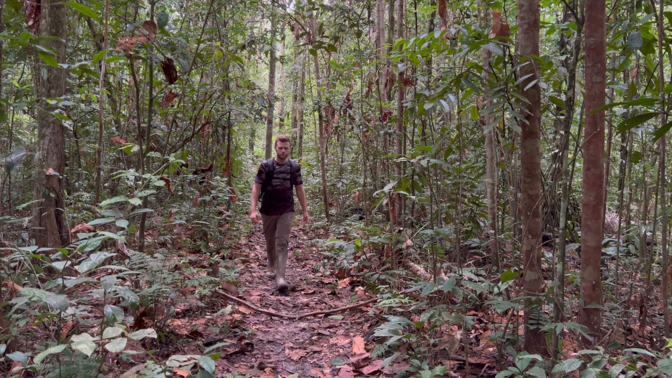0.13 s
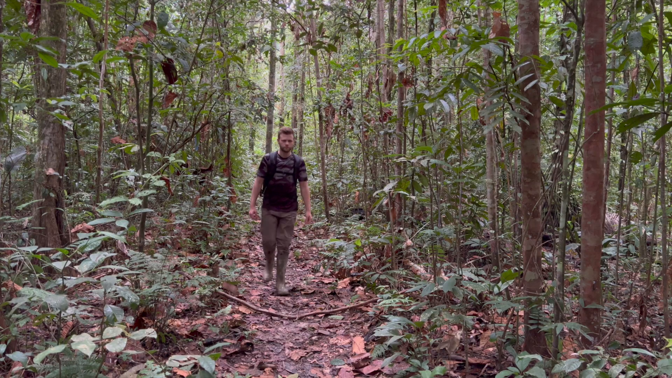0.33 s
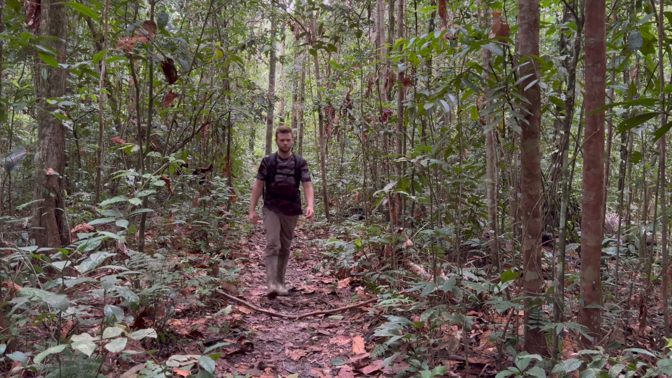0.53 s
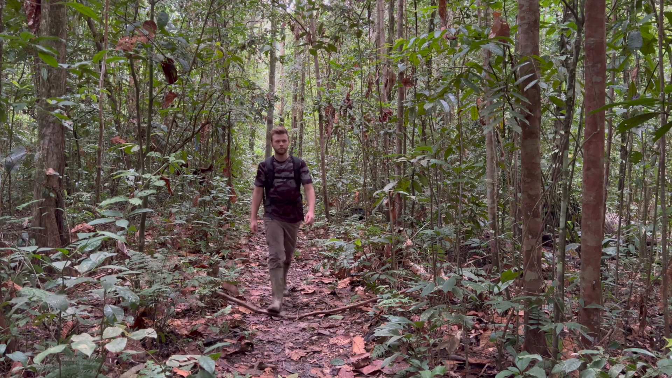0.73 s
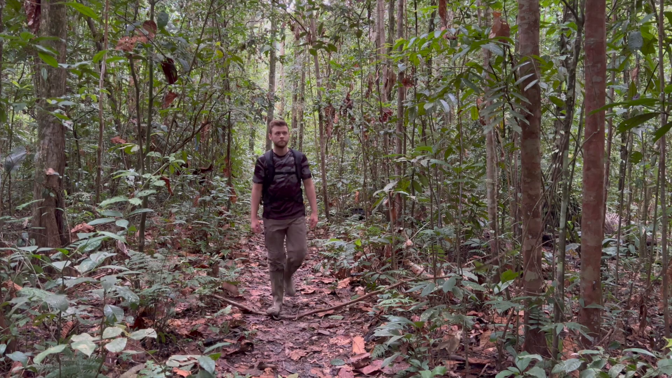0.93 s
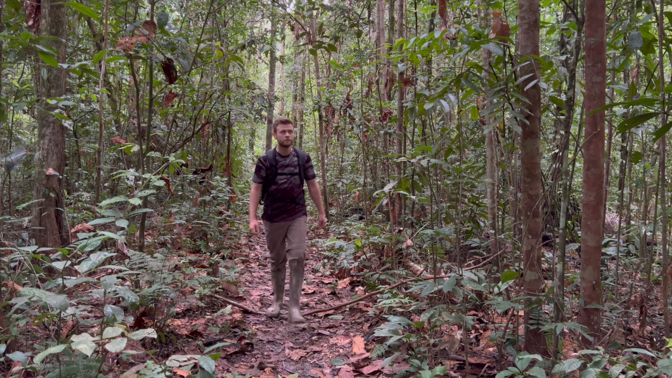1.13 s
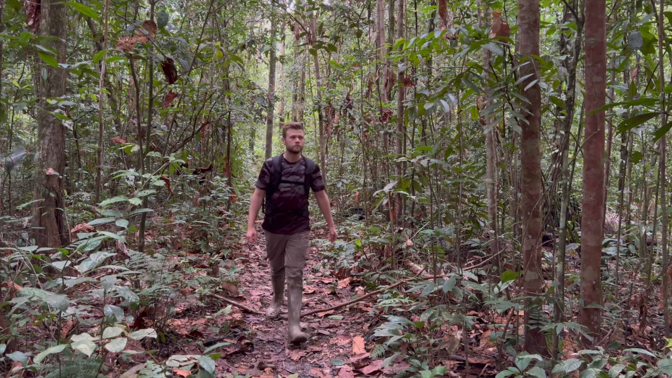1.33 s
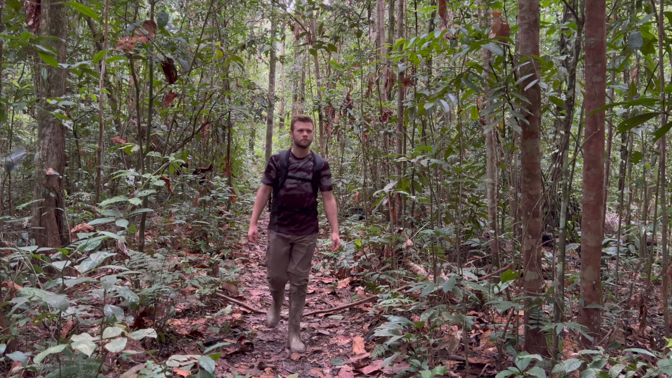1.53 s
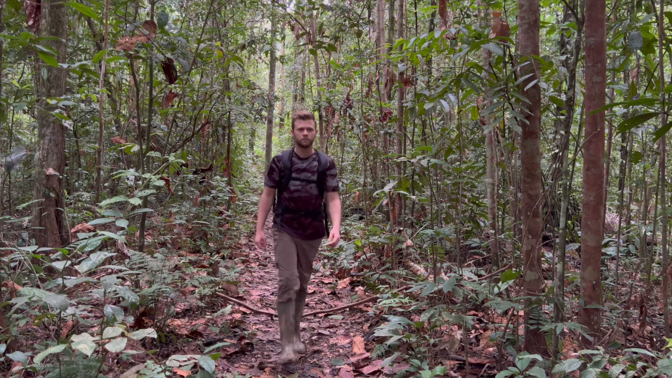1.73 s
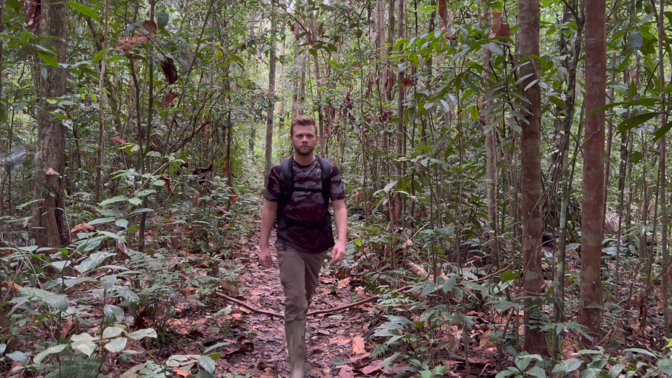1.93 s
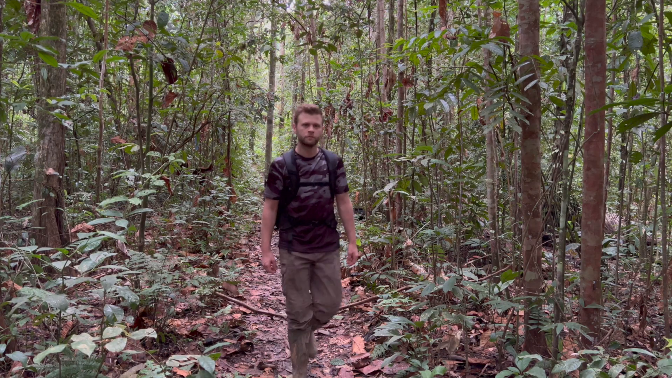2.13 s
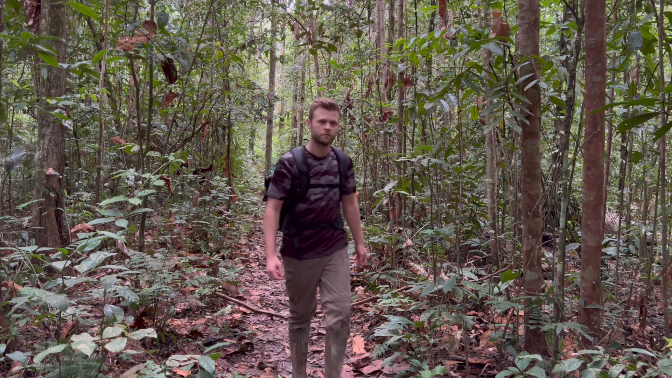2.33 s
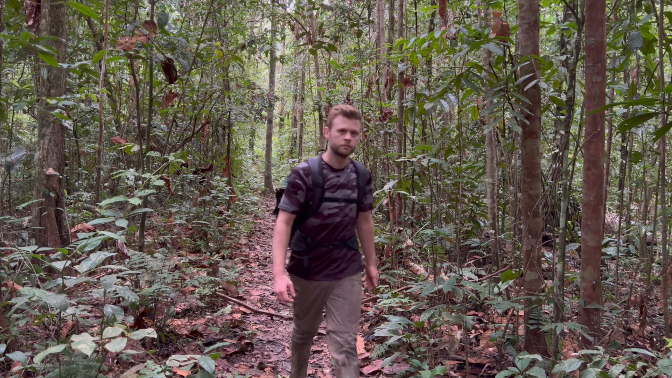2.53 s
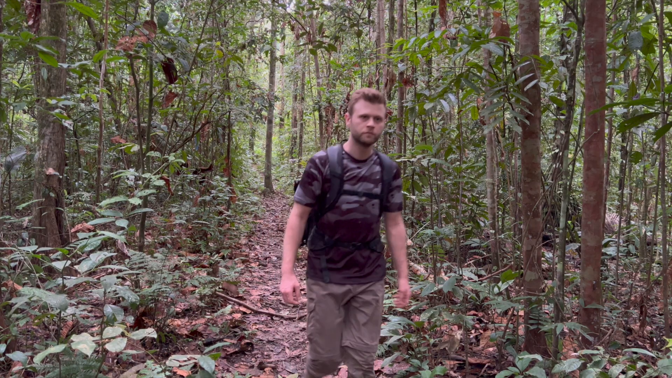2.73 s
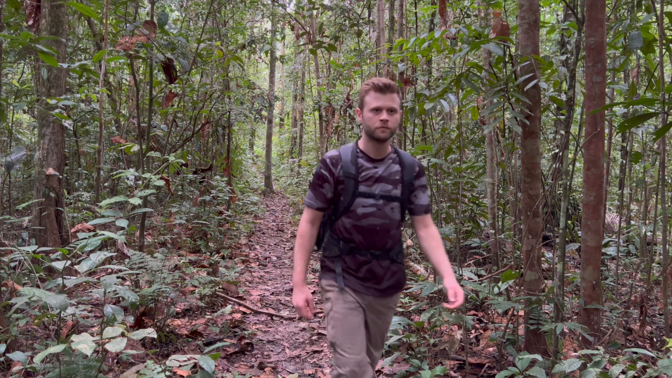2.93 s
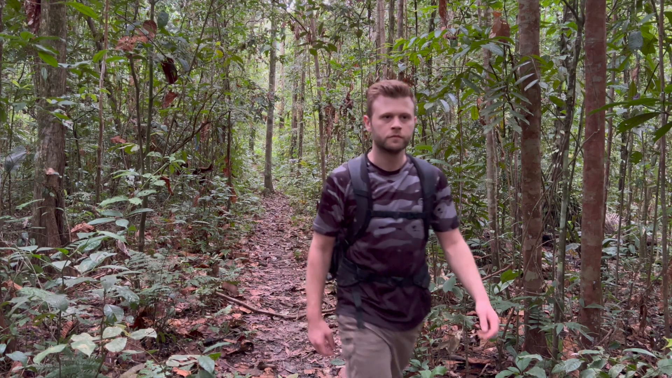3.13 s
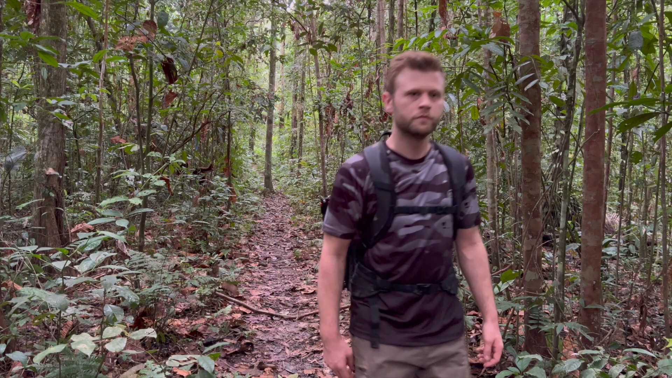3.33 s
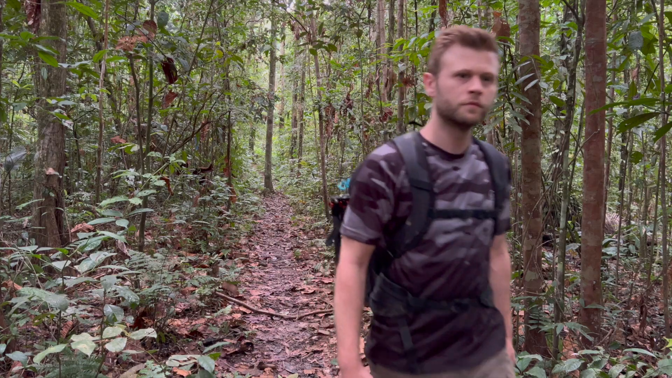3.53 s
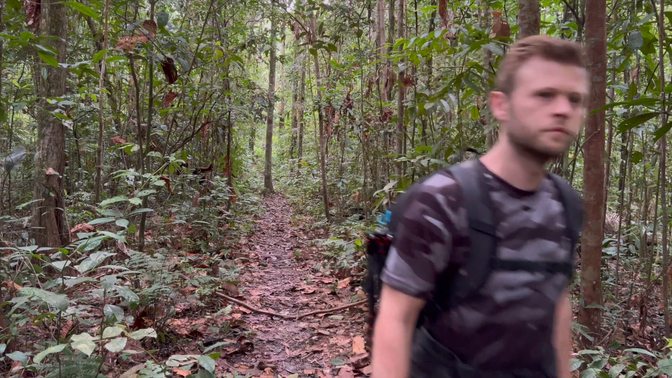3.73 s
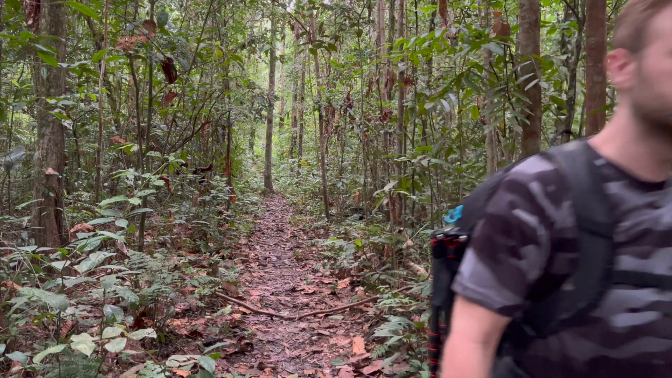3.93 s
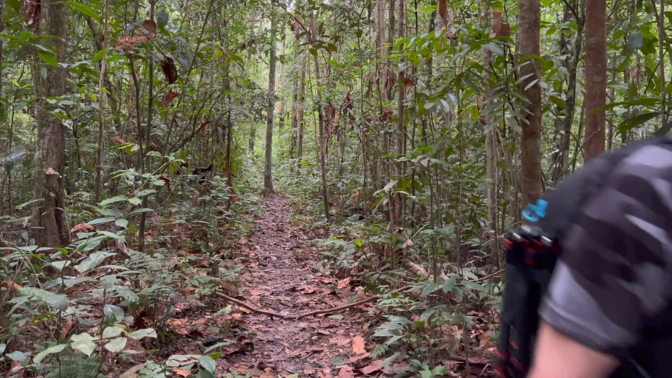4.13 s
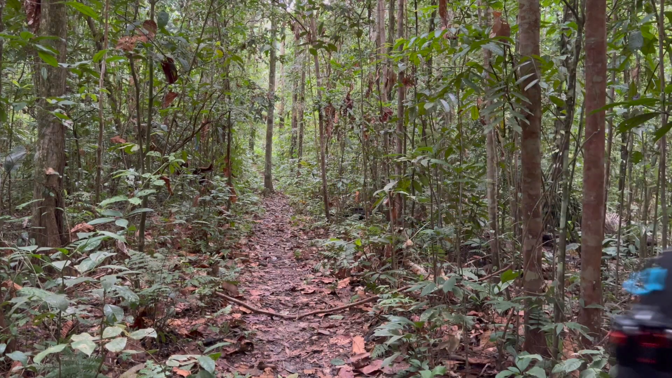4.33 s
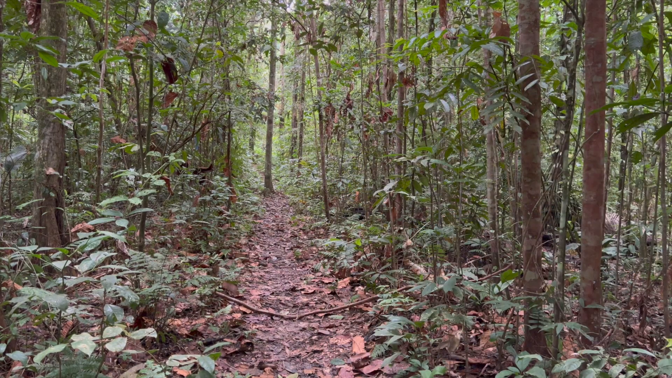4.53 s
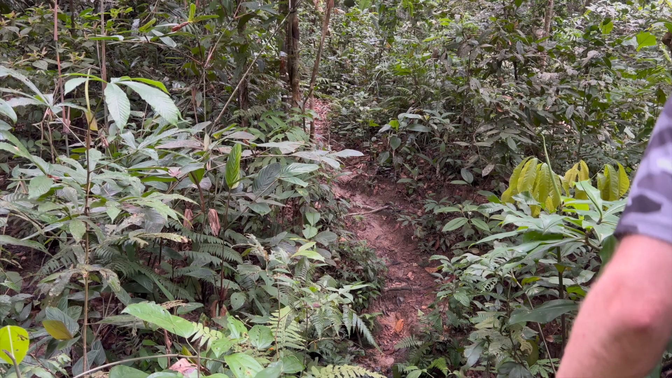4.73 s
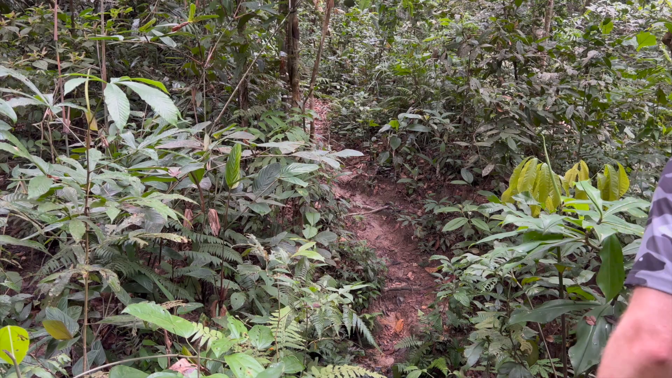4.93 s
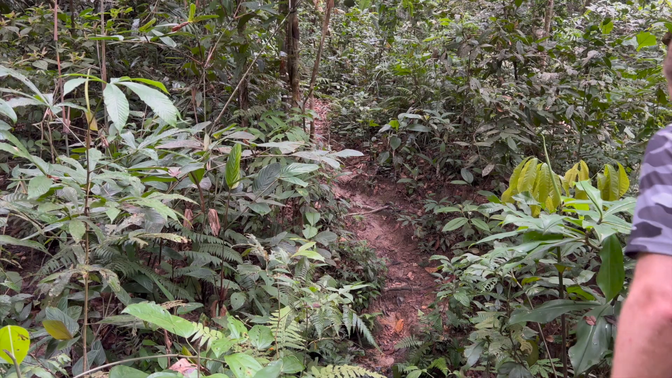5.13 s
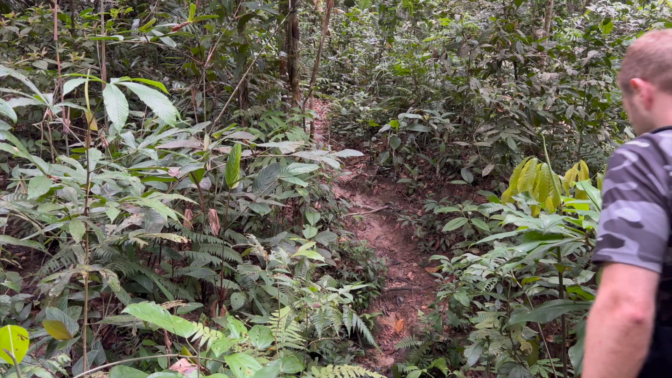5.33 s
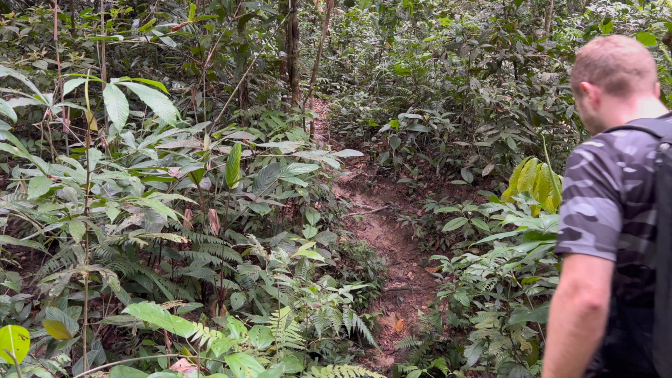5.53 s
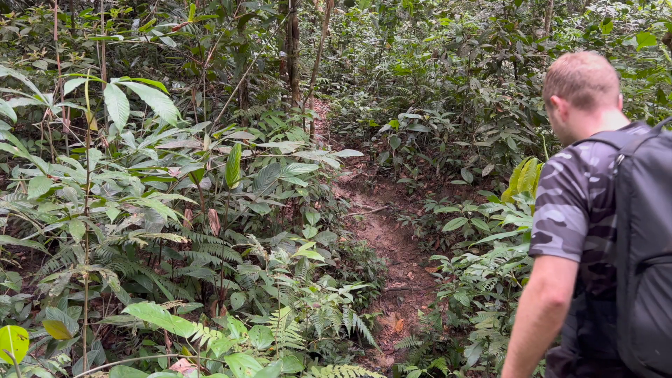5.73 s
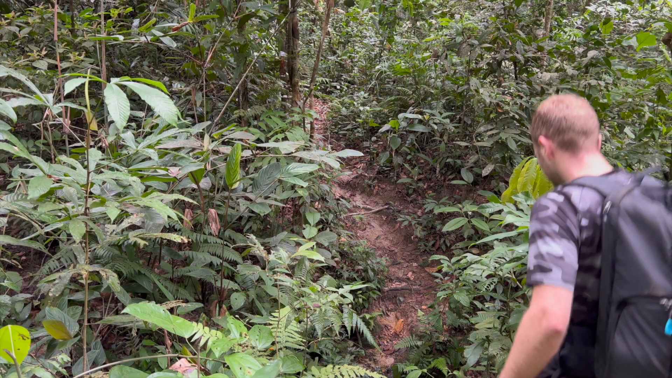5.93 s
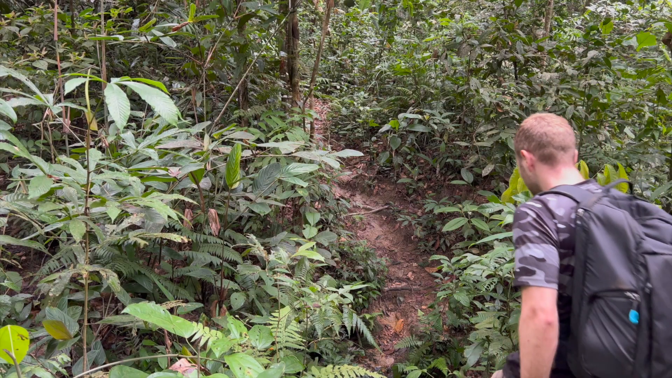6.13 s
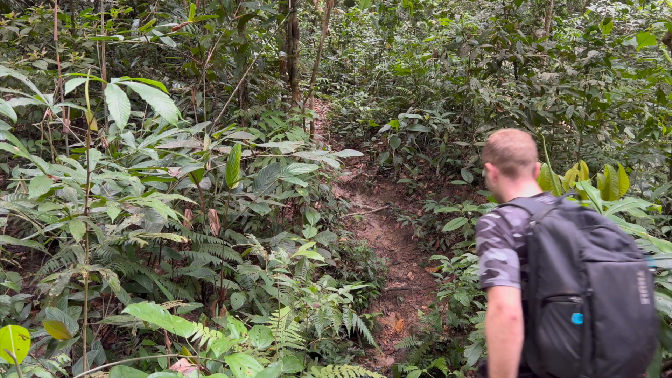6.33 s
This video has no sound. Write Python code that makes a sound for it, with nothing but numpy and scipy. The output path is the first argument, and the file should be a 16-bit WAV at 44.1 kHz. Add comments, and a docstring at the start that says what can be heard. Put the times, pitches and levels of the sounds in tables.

```python
"""From the start, background hush, blurred insect choirs and single crickets (wavering tones, lightly
pulsed) surround a phone. A walker comes down a leafy trail: noise bursts snap twigs, clouds of tiny
cracks crunch leaves, and decaying sines thud on soft earth. At 3.64-3.84 s the walker swings from
ahead to the right. At 4.7 s hush and insects switch to the second scene; leaf or strap rubbing
squeaks as bands of noise, and from 5.17 s a near cricket adds rising chirps."""
import sys
import numpy as np
from scipy import signal
from scipy.fft import rfft, irfft
from scipy.io import wavfile
from scipy.ndimage import uniform_filter1d

SR = 44100
rng = np.random.default_rng(int(sys.argv[2]) if len(sys.argv) > 2 else 0)


def dump(signal):
    """Clip the signal to [-1, 1] and save it as 16-bit WAV at the path in sys.argv[1]."""
    limited = np.clip(np.atleast_2d(signal).T, -1, 1)
    pcm = np.round(limited * 32767).astype(np.int16)
    wavfile.write(sys.argv[1], SR, pcm)


N = 280917
T = np.arange(N) / SR
HZ = np.fft.rfftfreq(N, 1 / SR) + 1  # shifted by 1 Hz so that its logarithm exists

# Background noise of each scene; the first is dark around 9 kHz:
# (frequency [Hz], relative spectrum level [dB])
HUSH_SPECTRA = [
    [(25, -5), (60, 6.5), (200, -6), (1000, -11.5), (3200, -10), (7000, -14.5), (9000, -110), (11000, -10),
     (12500, -10.5), (15500, -15.5)],
    [(25, -27), (60, -9), (200, -8.5), (1000, -7.5), (3200, -11.5), (7000, -20), (9000, -4), (11000, -48),
     (12500, -10), (14500, -21), (15500, -36)],
]
# Hush in the first and the second scene: (level [dB])
HUSH_LEVELS = [-69, -57]
# Distant insect choirs: (centre [Hz], width [Hz], level in first scene [dB], level in second scene [dB])
INSECT_CHOIRS = [(4270, 570, -67.5, -83), (5300, 385, -66, -64.5), (5594, 174, -63, -59),
                 (5930, 150, -72, -70), (6360, 150, -77.5, -81), (7820, 470, -72, -65.5)]
# Single crickets: (tone [Hz], wing strokes [1/s], level in first scene [dB], level in second scene [dB])
SINGLE_CRICKETS = [(5665, 58.5, -65, -71), (5612, 58, -66, -72), (5545, 73, -65, -72), (5435, 44, -69, -70),
                   (5583, 58, -80, -64), (5300, 72, -72, -68)]
# Twigs and stiff leaves breaking: (time [s], ring level [dB], ring [Hz], crack relative to ring [dB])
TWIG_SNAPS = [(0.021, -74, 2380, 27), (0.079, -55, 689, 8), (0.131, -44, 1390, 8.5), (0.205, -69, 1840, 20),
              (0.32, -57, 1240, -21), (0.434, -52, 920, -12), (1.047, -56, 931, -17), (1.169, -55, 620, 5),
              (1.412, -40, 2180, -15), (2.117, -51.5, 1090, -24), (2.355, -45.5, 2300, -32),
              (2.495, -47.5, 2510, 5.5), (2.646, -35, 890, -26), (2.797, -44.5, 805, -20),
              (2.823, -31.5, 596, -26), (2.835, -27.5, 870, -22), (2.841, -30, 1100, -23),
              (2.847, -28, 2350, 0), (2.869, -29.5, 2750, -1), (2.897, -52, 603, -4), (2.93, -47, 3440, -3),
              (3.206, -17, 1110, -2.5), (3.255, -31, 1260, -56), (3.457, -48, 815, -22),
              (3.539, -43.5, 710, 0), (3.587, -44, 730, 3.5), (3.651, -46.5, 1950, -10),
              (3.907, -38, 660, -4), (3.969, -45, 850, -22), (4.112, -51.5, 805, 9.5),
              (4.191, -45, 2470, -9), (4.245, -33, 1550, -22), (4.2855, -28, 800, 9),
              (4.306, -25.5, 1200, 13.5), (4.583, -46.5, 666, -26), (4.75, -32.5, 1320, 10),
              (4.755, -15.5, 1370, -25), (4.761, -17.5, 1320, -4.5), (4.767, -25, 2190, -29),
              (4.832, -43, 666, 10), (4.916, -31.5, 1140, -25), (4.925, -33, 2210, -5),
              (4.934, -38, 2000, -2), (5.014, -25, 820, -8), (5.045, -38.5, 1000, 5),
              (5.125, -37.5, 2740, -7), (5.294, -39.5, 1900, -6), (5.343, -36.5, 1180, -12),
              (5.695, -40.5, 1470, -5), (5.706, -35, 1610, 0), (5.791, -47, 2220, -5),
              (5.84, -35.5, 1020, -10)]
# Leaf beds crushed under a shoe: (start [s], hold [s], leaves [dB], brightness [dB], earth [dB])
LEAF_CRUSHES = [(0.13, 0.039, -65, 33, -54.5), (0.316, 0.16, -77, -9.5, -83), (0.718, 0.093, -62, 2, -63.5),
                (0.79, 0.025, -65.5, -6, -66), (0.827, 0.034, -53, 4.5, -64), (0.95, 0.066, -62.5, -1, -65),
                (1.17, 0.024, -66, 1.5, -83), (1.353, 0.11, -64.5, -2.5, -62),
                (1.494, 0.11, -68.5, -4, -71), (1.939, 0.063, -64.5, 8, -54.5), (2.073, 0.04, -64, -3, -70),
                (2.166, 0.11, -76.5, -12, -90), (2.347, 0.048, -66, 3.5, -75.5),
                (2.49, 0.11, -58.5, 0.5, -63.5), (2.633, 0.015, -56, -3, -54),
                (2.835, 0.024, -42, 2.5, -52), (2.737, 0.046, -63, -11, -60), (3.126, .06, -63, 2, -58),
                (3.215, 0.047, -54, 6, -55.5), (3.339, 0.06, -59.5, 0, -66), (3.453, 0.011, -56, 2, -65),
                (3.568, 0.0081, -56.5, -1.5, -82), (3.743, 0.089, -57, 7.5, -58),
                (3.894, 0.14, -62.5, -8, -58), (4.186, 0.034, -59.5, 15, -73), (4.25, 0.06, -39, 6.5, -45),
                (4.434, 0.12, -65.5, -9.5, -58.5), (4.707, 0.04, -57, -2.5, -70),
                (4.743, 0.013, -42, 12, -48.5), (4.817, 0.053, -52.5, 7, -51.5),
                (4.899, 0.066, -46, 3.5, -61), (5.009, .04, -48.5, 9, -57.5),
                (5.292, 0.043, -55.5, -3, -60), (5.469, .09, -58.5, 11, -61.5),
                (5.631, 0.018, -68, -13.5, -69), (5.727, 0.056, -62, 5, -86), (5.834, 0.11, -58, 2, -61),
                (5.966, 0.054, -53, 3.5, -60.5), (6.173, 0.022, -58, 11, -62), (6.309, .05, -60.5, 17, -61)]
# Colour of dry rustle: (frequency [Hz], relative spectrum level [dB])
RUSTLE_SPECTRUM = [(3000, 1), (4500, 5.5), (6000, 2.5), (8000, 4), (10000, -4.5), (12000, 2.5),
                   (15500, -4.5)]
# Soles meeting the earth: (time [s], knock level [dB], earth ring relative to knock [dB])
SOLE_THUDS = [(0.128, -42, -12), (0.238, -49.5, 1), (0.732, -40, 1), (0.772, -42.5, -11),
              (0.967, -50.5, -1), (1.341, -57, 13), (1.418, -51, 5), (1.961, -38.5, -3), (1.985, -35, -25),
              (2.074, -39.5, -32), (2.54, -39, -18), (2.615, -46, -7), (2.838, -36, -16), (2.864, -39, -19),
              (2.884, -36.5, -16), (3.174, -49.5, 6), (3.203, -35, -17), (3.249, -53, 11),
              (3.757, -48, 8.5), (3.91, -43, 9), (3.941, -47, -6), (4.26, -38, -21), (4.282, -46, -4),
              (4.303, -38.5, 1.5), (4.356, -45, 5), (4.466, -37, 6), (4.481, -42, -8.5),
              (4.754, -33.5, -30), (4.816, -37, -18), (4.829, -38.5, 4), (5.012, -40, -2), (5.215, -44, -8),
              (5.292, -43, -13), (5.34, -39, -33), (5.521, -44, -18), (5.847, -36, -34), (5.942, -49, 9),
              (5.969, -51, -2), (6.244, -50, 6)]
# Modes of a thud, in order knock, slap and two earth rings: (frequency [Hz], t60 [s], level [dB])
THUD_MODES = [(328, 0.016, 3), (574, 0.018, -12), (94, 0.055, -2.5), (160, 0.084, -9.5)]
# Rubbing of a leaf or strap: (start [s], length [s], centre [Hz], level [dB])
RUB_SQUEAKS = [(4.663, .03, 1590, -68), (5.377, 0.031, 1483, -59.5)]
# Chirps of a near cricket: (start [s], length [s], level [dB])
NEAR_CHIRPS = [(5.171, .17, -57), (5.397, 0.18, -57.5), (5.627, 0.17, -57), (5.852, 0.162, -56.5),
               (6.192, 0.35, -57)]
# Likeness of the two ports in diffuse sound: (frequency [Hz], common share of power [0-1])
PORT_LIKENESS = [(100, 0.82), (1000, 0.21), (3000, 0.1), (6000, 0.05), (7500, 1), (9000, 0.64),
                 (10800, .999), (11500, .7), (13000, 0.6), (15500, 0.9)]
# Left over right port for sound from ahead: (frequency [Hz], level difference [dB])
AHEAD_BALANCE = [(60, 1), (400, -2), (1400, 0.5), (3400, 1.5), (4400, 4.5), (5400, 8.5), (6500, 6),
                 (7600, 0.5), (9000, 0), (16000, 2.5)]
# Left over right port for sound from beside: (frequency [Hz], level difference [dB])
BESIDE_BALANCE = [(60, 1.5), (400, -3.5), (1400, -8), (2400, 0), (3400, 3.5), (4400, 2), (5400, 11.5),
                  (6500, 0), (7600, 3.5), (16000, -2)]
# Treble end that both phase tables below share: (frequency [Hz], phase difference [rad])
TREBLE_RAD = [(8500, -1.8), (9300, -3), (10700, -3.3), (11600, -4.6), (12500, -6.1), (14200, -6.5),
              (15000, -7.4), (15800, -8.7)]
# Left against right port for sound from ahead: (frequency [Hz], phase difference [rad])
AHEAD_PHASE = [(60, -0.014), (1400, 0.82), (2400, 0.57), (3400, 0.97), (5500, 1.0), (6500, 0.31),
               (7600, -1.16)] + TREBLE_RAD
# Left against right port for sound from beside: (frequency [Hz], phase difference [rad])
BESIDE_PHASE = [(60, 0.15), (340, -0.93), (1400, -0.81), (2400, -1.16), (3400, -1.9), (5500, -1.67),
                (6500, -1.67), (7600, -1.3)] + TREBLE_RAD

SECOND_SCENE_S = 4.7  # hush and insects switch to the second scene
PASS_START_S, PASS_END_S = 3.64, 3.84  # the walker swings from ahead to the right
SNAP_T60_S = 0.013
RISE_DB_S, FALL_DB_S = 1100, 196  # a crush swells and dies
SETTLE_DB, SETTLE_DB_S = -11.5, 47  # leaves keep settling: relative level and fall per second
DAMP_DB, DRY_DB, DRY_PER_BRIGHT = -3.5, -4.5, 0.2  # brightness takes from damp litter, adds to dry
POPS_PER_S, POP_LOW_HZ, POP_HIGH_HZ = 90, 436, 3020
POP_Q, POP_DB = 6.1, -8.5  # level relative to the leaves
CHIRP_HZ, CHIRP_RISE_HZ = 7820, 246
TRUNKS_T60_S, TRUNKS_DB = 0.079, -11.5
LATE_TURNS = 1.8  # cycles by which frequencies above 30 Hz lag
TOP_HZ = 15700


def undb(db):
    """Level law: decibels to amplitude gain."""
    return 10 ** (np.asarray(db) / 20)


def unit(x):
    """Energy normalisation: scale to rms 1."""
    return x / np.sqrt(np.mean(x ** 2))


def over_hz(table):
    """Logarithmic frequency scale: read a (Hz, value) table at every frequency."""
    hz, value = np.transpose(table)
    return np.interp(np.log(HZ), np.log(hz + 1), value)


def band(x, lo_hz, hi_hz, order=2):
    """Frequency selection: a causal band-pass."""
    return signal.sosfilt(signal.butter(order, [lo_hz, hi_hz], "band", fs=SR, output="sos"), x)


def walk(rate):
    """Slow random modulation: levels held 1 / rate s, smoothed twice, with rms 1."""
    hold = int(SR / rate)
    steps = np.repeat(rng.standard_normal(N // hold + 1), hold)
    return unit(uniform_filter1d(uniform_filter1d(steps, hold), hold)[:N])


def add(out, s, x):
    """Superposition: mix a short sound in at time s."""
    i = max(int(s * SR), 0)
    out[i:i + len(x)] += x[:N - i]


def by_scene(first_db, second_db):
    """Level change between the two scenes: the gain glides over 40 ms."""
    return undb(np.interp(T, [SECOND_SCENE_S - .02, SECOND_SCENE_S + .02], [first_db, second_db]))


def ports(x, balance_db, phase_rad):
    """Directional hearing: level and phase differences between the left and right port."""
    half = undb(over_hz(balance_db) / 2) * np.exp(.5j * over_hz(phase_rad))
    return irfft(rfft(x) * np.array([half, 1 / half]), N)


def diffuse(make):
    """Partial coherence: a share common to both ports plus an independent share for each."""
    alike = np.clip(over_hz(PORT_LIKENESS), 0, 1)
    common = ports(make(), AHEAD_BALANCE, AHEAD_PHASE)
    own = np.array([ports(make(), AHEAD_BALANCE, AHEAD_PHASE)[k] for k in range(2)])
    return irfft(np.sqrt(alike) * rfft(common) + np.sqrt(1 - alike) * rfft(own), N)


def hush():
    """Broadband noise: random noise with a shaped spectrum breathes slowly."""
    def noise(spectrum, db):
        """Spectral shaping of white noise to a set level."""
        white = rfft(rng.standard_normal(N))
        return undb(db) * unit(irfft(white * undb(over_hz(spectrum)), N))

    first, second = (noise(c, db) for c, db in zip(HUSH_SPECTRA, HUSH_LEVELS))
    return (first * by_scene(0, -60) + second * by_scene(-49, 0)) * undb(walk(1.6))


def choirs():
    """Incoherent summation: many far insects blur into narrow noise bands that flicker."""
    out = np.zeros(N)
    for hz, width, first_db, second_db in INSECT_CHOIRS:
        blur = unit(band(rng.standard_normal(N), hz - width / 2, hz + width / 2, order=3))
        out += by_scene(first_db, second_db) * undb(1.7 * walk(12)) * blur
    return out


def crickets():
    """Amplitude modulation: wing strokes lightly pulse each wavering tone."""
    out = np.zeros(N)
    for hz, rate, first_db, second_db in SINGLE_CRICKETS:
        tone = np.sin(2 * np.pi * np.cumsum(hz + 11 * walk(12)) / SR)
        stroke_hz = rate * (1 + 0.0182 * walk(1.3))
        strokes = 1 + 0.23 * np.sin(2 * np.pi * np.cumsum(stroke_hz) / SR)
        out += by_scene(first_db, second_db) * undb(2.24 * walk(16)) * strokes * tone
    return ports(out, AHEAD_BALANCE, AHEAD_PHASE)


def crest(x):
    """Envelope peak: the power is first smoothed over a millisecond."""
    return np.sqrt(2 * uniform_filter1d(x ** 2, size=SR // 1000).max())


def snaps():
    """Brittle fracture: a burst of tearing fibres excites a dull wood ring and a bright crack."""
    out, t = np.zeros(N), T[:SR // 12]
    for s, db, hz, crack_db in TWIG_SNAPS:
        decay = 1000 ** (-t / SNAP_T60_S) + 0.17 * 1000 ** (-t / (2.0 * SNAP_T60_S))
        burst = rng.standard_normal(len(t)) * decay
        burst[0] += 4.0  # the first break
        ring = band(burst, hz / 1.44, hz * 2.0) + 0.26 * band(burst, 330, 3200)
        crack = band(burst, 2200, 14000, order=1) + 1.3 * band(burst, 5590, 5750, order=1)
        crack = crack / crest(band(crack, 6000, 13400))
        add(out, s, undb(db) * (ring / crest(ring) + undb(crack_db) * crack))
    return out


def grains(per_s, scatter_db, smear_s):
    """Shot noise: random cracks of very uneven size, each a short puff of noise."""
    size = undb(scatter_db * np.minimum(rng.exponential(1, N), 4))
    cracks = (rng.random(N) < per_s / SR) * size
    envelope = signal.lfilter([1], [1, -np.exp(-1 / (smear_s * SR))], cracks)
    return envelope * rng.standard_normal(N)


def crumple(lo_hz, hi_hz, per_s, smear_s, count):
    """Size and pitch: pieces of different size crack independently, each in its own band."""
    edges = np.geomspace(lo_hz, hi_hz, count + 1)
    pieces = (band(unit(grains(per_s, 2.76, smear_s)), a, b, order=1) for a, b in zip(edges, edges[1:]))
    return unit(sum(pieces))


def press(levels_db):
    """Power summation of crushes: each swells, holds, dies and leaves a slow settling."""
    power = np.zeros(N)
    for (s, hold, *_), db in zip(LEAF_CRUSHES, levels_db):
        before, after = np.maximum(s - T, 0), np.maximum(T - s - hold, 0)
        fall = undb(-FALL_DB_S * after) ** 2
        settling = undb(SETTLE_DB - SETTLE_DB_S * after) ** 2
        power += undb(db - RISE_DB_S * before) ** 2 * (fall + settling)
    return np.sqrt(power)


def pops():
    """Buckling: stiff leaves give damped pitched ticks of uneven size at random moments."""
    out, t = np.zeros(N), T[:SR // 25]
    for when, pitch, size in rng.random((int(POPS_PER_S * N / SR), 3)):
        hz = POP_LOW_HZ * (POP_HIGH_HZ / POP_LOW_HZ) ** pitch
        tick = np.sin(2 * np.pi * hz * t) * np.exp(-np.pi * hz * t / POP_Q)
        add(out, when * N / SR, (size + .05) ** -.6 * tick)
    return unit(out)


def litter():
    """Granular crushing: earth, damp litter and dry leaves give way under the shoes."""
    _, _, leaves_db, bright_db, earth_db = np.transpose(LEAF_CRUSHES)
    earth_gain, leaf_gain = press(earth_db), press(leaves_db)
    damp_gain = press(leaves_db + DAMP_DB - bright_db)
    dry_gain = press(leaves_db + DRY_DB + DRY_PER_BRIGHT * bright_db)
    fine = unit(grains(4600, 2.6, 0.0051))
    coarse = unit(grains(380, 2.1, 0.0024))
    rustle = irfft(rfft(band(fine + 1.17 * coarse, 4050, 16600)) * undb(over_hz(RUSTLE_SPECTRUM)), N)
    rustle = rustle / np.std(band(rustle, 10400, 19300))  # level set by its upper treble
    leaves = crumple(827, 4390, 250, 0.0026, count=5)
    leaves += 2.04 * unit(band(0.79 * fine + coarse, 1330, 5700))
    leaves = unit(leaves) + undb(POP_DB) * pops()
    earth = unit(band(grains(120, 3.06, 0.0035), 41, 234))
    damp = crumple(253, 1056, 150, 0.0027, count=4)
    return earth_gain * earth + damp_gain * damp + leaf_gain * leaves + dry_gain * rustle


def thuds():
    """Modal impact: each footfall knocks, slaps and rings the soft earth as decaying sines."""
    out, t = np.zeros(N), T[:SR // 8]
    for s, db, earth_db in SOLE_THUDS:
        blows_db = (db, db, db + earth_db, db + earth_db / 2)
        for (hz, t60, mode_db), blow_db in zip(THUD_MODES, blows_db):
            mode_hz = hz * (1 + 0.062 * rng.standard_normal())
            add(out, s, undb(mode_db + blow_db) * np.sin(2 * np.pi * mode_hz * t) * 1000 ** (-t / t60))
    return out


def squeaks():
    """Friction: rubbing gives a rough short tone, made as a narrow band of noise."""
    out = np.zeros(N)
    for s, length, hz, db in RUB_SQUEAKS:
        t = T[:int(length * SR)]
        rough = unit(band(rng.standard_normal(SR // 4), hz - 60, hz + 60))[-len(t):]
        add(out, s, undb(db) * np.sin(np.pi * t / length) * rough)
    return out


def near_cricket():
    """Frequency and amplitude modulation: chirps rise in pitch, pulsed by wing strokes."""
    near = np.zeros(N)
    for s, length, db in NEAR_CHIRPS:
        u = T[:int(length * SR)] / length  # share of the chirp elapsed
        hz = CHIRP_HZ - CHIRP_RISE_HZ * np.exp(-u / 0.17)
        strokes = 1 + 0.81 * np.sin(2 * np.pi * 82 * u * length)  # 82 strokes per s
        tone = np.sin(2 * np.pi * np.cumsum(hz) / SR)
        add(near, s, undb(db) * np.sin(np.pi * u) ** .5 * strokes * tone)
    rasp = 1 + 0.19 * unit(band(rng.standard_normal(N), 35, 200))
    return ports(near * rasp, BESIDE_BALANCE, BESIDE_PHASE)


def walker():
    """Direct and scattered sound: footfalls turn from ahead to the right and echo off the trunks."""
    feet = snaps() + litter() + thuds() + squeaks()
    turn = np.interp(T, [PASS_START_S, PASS_END_S], [0, np.pi / 2])
    ahead = np.cos(turn) ** 2 * ports(feet, AHEAD_BALANCE, AHEAD_PHASE)
    beside = np.sin(turn) ** 2 * ports(feet, BESIDE_BALANCE, BESIDE_PHASE)
    t = T[:SR // 2]

    def scatter():
        """Multiple scattering: a decaying random tail that starts 2 ms late."""
        tail = rng.standard_normal(len(t)) * 1000 ** (-t / TRUNKS_T60_S) * (t > .002)
        return signal.fftconvolve(feet, tail / np.linalg.norm(tail))[:N]

    return ahead + beside + undb(TRUNKS_DB) * diffuse(scatter)


def scene():
    """Superposition of the surrounding forest, the crickets and the walker."""
    def forest():
        """Sum of the sounds that arrive from all around."""
        return hush() + choirs()

    return diffuse(forest) + crickets() + walker() + near_cricket()


def record(dry):
    """Dispersion and band limits: the phone delays the lows, drops deep bass and cuts the top."""
    late = np.exp(-2j * np.pi * LATE_TURNS * np.log(np.maximum(HZ, 30)))
    delayed = irfft(rfft(dry) * late, N)
    no_bass = signal.sosfilt(signal.butter(3, 45, "high", fs=SR, output="sos"), delayed)
    return signal.sosfilt(signal.ellip(8, .2, 70, TOP_HZ, fs=SR, output="sos"), no_bass)


dry = scene()
out = record(dry)
dump(out)
```